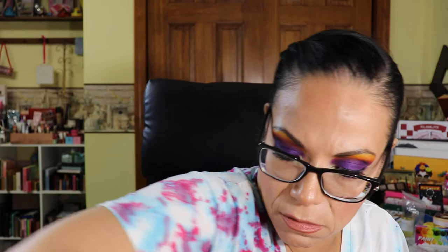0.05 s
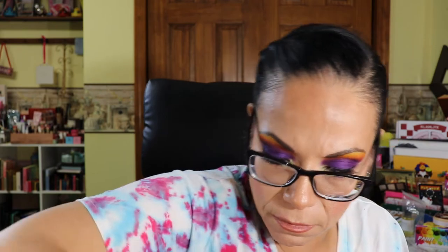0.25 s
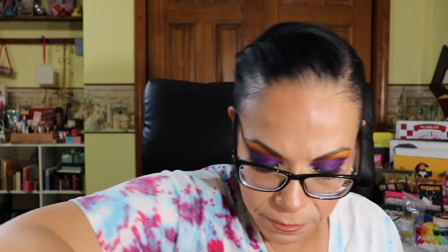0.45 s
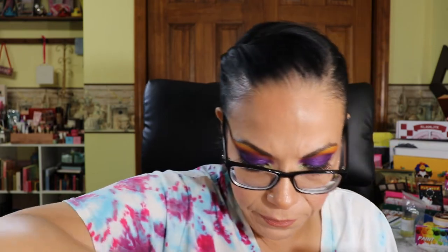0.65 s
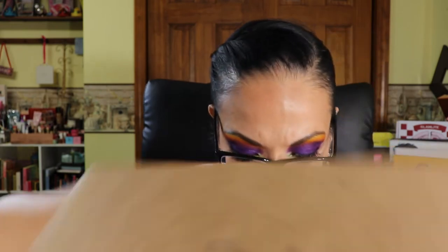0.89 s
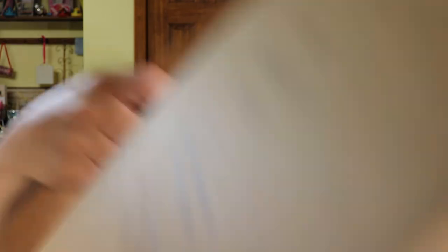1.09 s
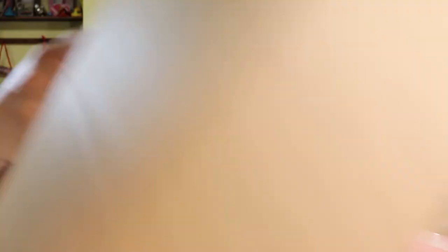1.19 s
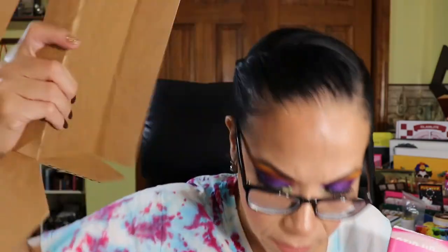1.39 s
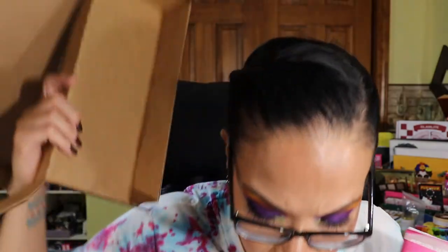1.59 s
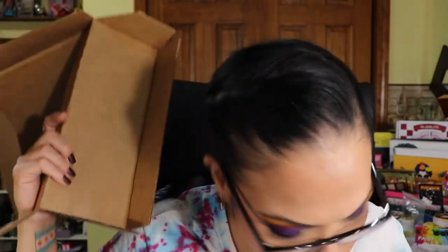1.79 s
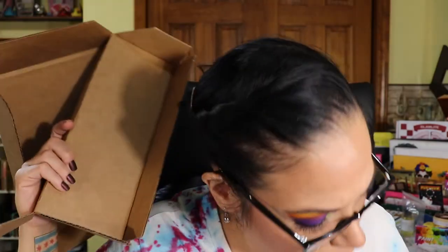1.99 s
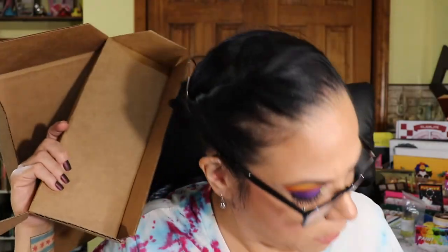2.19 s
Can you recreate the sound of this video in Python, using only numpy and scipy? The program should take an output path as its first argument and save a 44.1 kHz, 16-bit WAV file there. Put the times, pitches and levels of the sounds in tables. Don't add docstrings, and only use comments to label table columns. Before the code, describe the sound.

An empty cardboard box scrapes and hisses over a desk with hollow knocks and small squeaks, then is lifted with a thump and puff of air; quiet follows with a few light taps, close microphone, small room.

```python
import sys
import numpy as np
from scipy import signal
from scipy.io import wavfile

SR = 44100
rng = np.random.default_rng(int(sys.argv[2]) if len(sys.argv) > 2 else 0)


def wrap_up_sound(samples):
    columns = np.atleast_2d(samples).T
    tamed = np.clip(columns, -1, 1)
    steps = np.round(tamed * 32767).astype(np.int16)
    wavfile.write(sys.argv[1], SR, steps)


def amplitude_ratio(level_db):
    exponent = np.asarray(level_db, float) / 20
    return 10 ** exponent


N = 99225

# (pitch [Hz], level [dB], t60 [s])
BOX_MODES = [(102, -16, .2), (165, -9, .15), (210, -7, .1), (262, -4, .1), (365, -3, .1), (470, -5, .15),
             (730, -6, .12), (860, -10, .1), (996, -9, .1), (1150, -12, .1), (1430, -14, .13),
             (1730, -17, .13), (2100, -18, .15), (3600, -24, .12)]


def rms_one(x):
    return x / np.sqrt(np.mean(x ** 2) + 1e-20)


def at_hz(points, hz):
    point_hz, point_db = np.transpose(points)
    return np.interp(np.log(hz), np.log(point_hz), point_db)


def drift(rate_hz):
    r = np.exp(-80 * np.pi * rate_hz / SR)
    slow = signal.lfilter([1], [1, -2 * r, r * r], rng.standard_normal(N // 40 + 2002))[2000:]
    return np.interp(np.arange(N) / 40, np.arange(len(slow)), rms_one(slow))


def ring(clicks, hz, t60):
    r, w = amplitude_ratio(-60 / (t60 * SR)), 2 * np.pi * hz / SR
    return signal.lfilter([0, np.sin(w)], [1, -2 * r * np.cos(w), r * r], clicks + 1e-18)


def cut(x, hz, kind, order=2):
    return signal.sosfilt(signal.butter(order, hz, kind, fs=SR, output="sos"), x)


def grains(per_s, spread_db):
    sizes = amplitude_ratio(spread_db * np.minimum(rng.exponential(1, N), 5)) * rng.choice([-1, 1], N)
    return sizes * (rng.random(N) < per_s / SR)


def coloured(sources, spectrum, patchy_db):
    out = 0
    edges = 60 * 2 ** np.arange(0, 8.6, .5)
    for k, (low, high) in enumerate(zip(edges, edges[1:])):
        band = cut(sources[k % 2], [low, min(high, .45 * SR)], "band")
        band_db = at_hz(spectrum, np.sqrt(low * high)) + patchy_db * drift(41)
        out = out + amplitude_ratio(band_db) * band
    return rms_one(out)


def background():
    # (frequency [Hz], level per Hz [dB])
    air_spectrum = [(47, -39), (80, -16), (91, 18), (242, 6), (338, 8.5), (1310, 0), (1700, -88),
                    (5400, -49.5), (16000, -76.5)]
    # (centre [Hz], width [Hz], level [dB rms])
    whistles = [(1330, 300, -81), (2780, 300, -62), (3350, 310, -58), (5417, 450, -54.5)]
    # (frequency [Hz], level [dB rms])
    harmonics = [(60, -41), (120, -60), (180, -56.5), (240, -57.5)]
    t = np.arange(N) / SR
    out = amplitude_ratio(-52) * coloured(rng.standard_normal((2, N)), air_spectrum, patchy_db=1.5)
    for hz, width, db in whistles:
        out += amplitude_ratio(db) * rms_one(cut(rng.standard_normal(N), [hz - width / 2, hz + width / 2], "band"))
    for k, (hz, db) in enumerate(harmonics):
        out += np.sqrt(2) * amplitude_ratio(db) * np.sin(2 * np.pi * hz * t + 1.97 * k)
    return out


def hiss():
    # (frequency [Hz], level per Hz [dB])
    card_spectrum = [(710, -41), (1200, 1), (1430, -29), (1630, -6.5), (3550, -8.5), (8080, -16.5),
                     (12900, -22), (16000, -23.5)]
    crackle = amplitude_ratio(-1) * rms_one(grains(per_s=700, spread_db=3.0))
    fibres = [crackle + rms_one(grains(per_s=9000, spread_db=1.5)) for _ in range(2)]
    x = cut(coloured(fibres, card_spectrum, patchy_db=2.0), 900, "high")
    x = x * amplitude_ratio(1.2 * drift(40))
    return x / np.sqrt(np.mean(cut(x, 3140, "high", order=4) ** 2))


def drumming():
    # (time [s], level [dB])
    weight = [
        (0, -7.5),
        (.36, 2.5),
        (.42, 4.5),
        (.75, 7),
        (.85, 0.5),
        (2.25, 2),
    ]
    hand_damping = .35
    slips = grains(per_s=4000 * amplitude_ratio(2.3 * drift(30)), spread_db=3)
    dealt = rng.integers(0, len(BOX_MODES), N)
    weight_db = np.interp(np.arange(N) / SR, *np.transpose(weight))
    out = 0
    for k, (hz, db, t60) in enumerate(BOX_MODES):
        lowness = np.clip(np.log2(500 / hz), 0, 1)
        out = out + amplitude_ratio(db + weight_db * lowness) * ring(slips * (dealt == k), hz, hand_damping * t60)
    return rms_one(out)


def low_air(drum_db):
    gust_s, rise_s, fall_s = 1.035, 0.0031, 0.099
    t = np.maximum(np.arange(N) / SR - gust_s, 0)
    gust = amplitude_ratio(-22.5) * (1 - np.exp(-t / rise_s)) * np.exp(-t / fall_s)
    lumps = rms_one(cut(cut(rng.standard_normal(N), 43, "low"), 42, "high"))
    handling = rms_one(cut(rng.standard_normal(N), [60, 140], "band", order=3))
    return gust * lumps + amplitude_ratio(drum_db - 26) * handling


def knocks():
    # (time [s], peak [dB], flap pitch [Hz],
    # t60 [s], crack re peak [dB])
    box_knocks = [(.225, -14.5, 1080, 0.012, -15), (.2305, -3, 372, 0.02, -22),
                  (.2305, -2, 769, 0.034, -21.5), (.2395, -8, 432, 0.03, -48), (.241, -15, 304, 0.15, -50),
                  (.4, -27.5, 1100, 0.018, 2.5), (.407, -8, 432, 0.019, -24),
                  (.464, -17.5, 280, 0.03, -33), (.480, -16, 178, 0.033, -26),
                  (.485, -9.5, 751, 0.036, -4.5), (.492, -12, 887, 0.019, -15),
                  (.499, -12, 800, 0.024, -29), (.508, -8, 840, 0.018, -17), (.515, -10, 750, .03, -16),
                  (.526, -7, 797, 0.029, -19), (.583, -4, 284, 0.01, -26), (.6105, 1, 1047, 0.031, -15.5),
                  (.618, -9, 234, 0.058, -46), (.66, -13.5, 224, 0.045, -19), (.672, -19, 193, 0.045, -30),
                  (.6885, -4.5, 292, 0.02, -27), (.696, -13, 323, 0.021, -30),
                  (.705, -14.5, 147, 0.074, -40), (.722, -17, 182, 0.078, -39), (.753, -17, 300, .04, -30),
                  (.778, -14.5, 330, 0.04, -25), (.803, -15.5, 420, 0.058, -10.5),
                  (.823, -13, 375, 0.025, -20), (.826, -15, 956, 0.024, -11), (.842, -16, 334, 0.1, -46),
                  (.893, -23.5, 3710, 0.032, -1), (.897, -6, 709, 0.098, -40),
                  (.909, -9.5, 974, 0.088, -15.5), (.934, -34, 1060, 0.025, -1),
                  (0.898, -25, 347.4, 0.29, -42), (1.024, -44, 1500, 0.01, 0),
                     (1.034, -14, 499, 0.02, -6), (1.0332, -6.5, 790, 0.004, -22),
                     (1.035, -10, 232, 0.0084, -8), (1.0515, -7, 500, 0.011, -18),
                     (1.05, -12, 443, 0.019, -10.5), (1.039, -14.5, 131, 0.065, -42),
                     (1.2205, -39, 1900, .03, -6), (1.2277, -19.5, 2780, 0.015, -7),
                     (1.589, -49, 2930, 0.11, 1.5), (1.728, -41.5, 710, 0.026, -16),
                     (1.76, -41.5, 670, 0.02, -7), (1.8685, -22, 400, .02, -30),
                     (1.8785, -22, 330, 0.04, -20), (1.9, -20, 215, .04, -20),
                     (1.873, -26, 516, 0.084, -13), (1.88, -26.5, 747, 0.05, -3),
                     (1.965, -39, 896, 0.029, -8), (2.038, -36, 138, 0.098, -10),
                  (0.463, -14.5, 74, 0.079, -62),
        (.6, -13, 161, 0.045, -60),
        (.916, -2.5, 733, 0.036, -27.5),
        (1.035, -10, 66, 0.077, -62),
        (1.051, -8, 296, 0.016, -12),
    ]
    partner, partner_db = 1.13, -9
    box_db, box_slope_db, box_luck_db = -15, 2.5, 4.45
    crack_s, tail_s, tail_db = 0.0053, 0.054, -19.5
    fade_bend = 1.4

    rows = box_knocks
    out, t = np.zeros(N + SR), np.arange(SR // 2) / SR
    luck, body = rng.normal(0, 1, (80, 20)), np.zeros((len(BOX_MODES), N))
    noise = rms_one(cut(cut(rng.standard_normal(N + SR), 530, "high"), 2020, "low"))
    wobble = np.resize(amplitude_ratio(4 * drift(63)), N + SR)
    for (s, db, hz, t60, crack_db), z in zip(rows, luck):
        i = int(s * SR)
        here = slice(i, i + len(t))
        swing = np.sin(2 * np.pi * hz * t)
        swing += amplitude_ratio(partner_db) * np.sin(2 * np.pi * hz * partner * t + z[19])
        swing *= wobble[here] ** np.minimum(3 * t / t60, 1)
        swing *= (1 - np.exp(-t * hz * 2)) * amplitude_ratio(-60 * (t / t60) ** fade_bend)
        crack_fade = np.exp(-t / crack_s) + amplitude_ratio(tail_db) * np.exp(-t / tail_s)
        crack = amplitude_ratio(crack_db) * noise[here] * crack_fade
        out[here] += amplitude_ratio(db) * (crack - swing)
        for k, (mode_hz, mode_db, _) in enumerate(BOX_MODES):
            octaves = abs(np.log2(mode_hz / hz))
            click_db = db + box_db + mode_db - box_slope_db * octaves + box_luck_db * z[k]
            body[k, i] += amplitude_ratio(click_db) * np.sign(z[k + 1])
    return out[:N] + sum(ring(clicks, hz, t60) for clicks, (hz, _, t60) in zip(body, BOX_MODES))


def snaps():
    # (time [s], peak [dB], decay [s], lowest frequency [Hz])
    bursts = [(0.228, -31, 0.0034, 3020), (.486, -38, 0.0027, 3000), (0.897, -25.5, 0.0096, 2940),
              (0.934, -26.5, 0.0018, 4000), (1.024, -42, .02, 5500), (1.034, -21, 0.002, 1780),
              (1.0455, -30, 0.008, 5000), (1.2224, -29, 0.00057, 4970), (1.225, -22.5, 0.003, 2480),
              (1.882, -39.5, 0.011, 3030), (1.256, -48, .012, 4000), (1.959, -41, 0.0069, 5030)]
    t, noise = np.arange(N) / SR, rng.standard_normal(N)
    out = np.zeros(N)
    for s, db, fall_s, hz in bursts:
        band = cut(cut(noise, hz, "high"), min(0.3 * hz, .45 * SR), "low", order=1)
        fade = (t >= s) * np.exp(-np.maximum(t - s, 0) / fall_s)
        out += amplitude_ratio(db) * fade * rms_one(band)
    return out


def rings():
    # (time [s], peak [dB], pitch [Hz], t60 [s])
    free_modes = [(.2329, -3, 395, .035), (.2326, -12, 510, .05), (.256, -25, 420, .2),
                  (1.1, -24, 110, .15), (1.8718, -12, 208, .1), (1.0355, -2, 290, .016),
                  (.2325, -8, 800, .05), (.232, -25, 1590, 0.024), (.25, -26, 747, .15),
                  (1.052, -22, 342.3, .33), (1.052, -17.5, 497, 0.074), (1.226, -26, 1940, 0.054),
                  (1.2255, -29, 2850, 0.056), (1.226, -29, 3460, .03), (1.2255, -25, 5050, 0.017),
                  (1.06, -33, 1733, .3), (1.062, -35, 1432, .25), (1.874, -27, 635, 0.12),
                  (1.876, -24.5, 804, 0.097), (1.878, -31, 1103, 0.089), (1.905, -22, 206.5, .35),
                  (1.962, -40, 749, 0.24), (2.03, -32.5, 205, 0.12), (2.07, -46, 752, 0.21)]
    out = np.zeros(N)
    for s, db, hz, t60 in free_modes:
        i = int(s * SR)
        click = np.zeros(N - i)
        click[0] = -amplitude_ratio(db)
        out[i:] += ring(click, hz, t60)
    return out


def squeaks():
    # (time [s], length [s], pitch [Hz], level [dB])
    rubs = [(.42, 0.013, 1970, -38), (.49, 0.047, 1880, -29), (.508, .02, 4300, -28),
            (0.546, 0.034, 1450, -29), (0.56, .016, 3680, -32), (.577, 0.013, 2280, -31),
            (0.71, .014, 2420, -47), (.73, .045, 5360, -40), (0.734, 0.036, 2110, -36),
            (0.76, 0.017, 3500, -37.5), (.79, 0.058, 5400, -40), (0.822, 0.016, 4000, -44),
            (1.234, .04, 2300, -46), (1.055, 0.06, 1212, -46), (.665, .04, 6000, -44),
            (.67, .03, 11000, -48), (1.09, .05, 10500, -58)]
    width = 0.078
    t, noise = np.arange(N) / SR, rng.standard_normal(N)
    out = np.zeros(N)
    for s, length, hz, db in rubs:
        swell = np.sqrt(np.sin(np.pi * np.clip((t - s) / length, 0, 1)) + 1e-12)
        out += amplitude_ratio(db) * swell * rms_one(ring(noise, hz, 2.8 / (width * hz)))
    return out


def ticks():
    # (time [s], peak [dB])
    edges_let_go = [
        (1.2227, -26),
        (1.2246, -5),
        (1.2251, -14),
    ]
    out = np.zeros(N)
    for s, db in edges_let_go:
        out[int(s * SR)] = amplitude_ratio(db)
    return cut(out, 7000, "high")


def room(x):
    t60, wall_cut_hz = 0.19, 4200
    out, dull = np.zeros(N), np.exp(-2 * np.pi * wall_cut_hz / SR)
    lags = (rng.uniform(.012, 0.032, 10) * SR).astype(int)
    for k, lag in enumerate(lags):
        loop, gain, state = x.copy(), amplitude_ratio(-60 * lag / SR / t60), [0.]
        for i in range(lag, N, lag):
            back, state = signal.lfilter([gain * (1 - dull)], [1, -dull], loop[i - lag:i], zi=state)
            loop[i:i + lag] += back[:N - i]
        out += (loop - x) * (-1) ** k
    return out


def scene():
    # (time [s], hiss [dB], drumming of the panels [dB])
    slide = [(0, -42.5, -27), (.12, -41, -29.5), (0.229, -39, -27), (.24, -47, -19), (0.372, -47.5, -35.5),
             (0.408, -42, -22), (.5, -33.5, -17.5), (0.604, -32, -18), (.635, -38, -25), (0.689, -37, -17),
             (.79, -34.5, -32.5), (0.836, -39.5, -18), (.885, -47.5, -31.5), (1.02, -55.5, -38),
             (1.3, -64, -60.5), (1.84, -54, -51.5), (1.9, -48, -37.5), (2.25, -66, -56.5)]
    t = np.arange(N) / SR
    times, hiss_points, drum_points = np.transpose(slide)
    hiss_db = np.interp(t, times, hiss_points)
    drum_db = np.interp(t, times, drum_points)
    sliding = amplitude_ratio(hiss_db + 1.67) * hiss() + amplitude_ratio(drum_db - 2) * drumming()
    box = sliding + knocks() + snaps() + rings() + squeaks() + ticks()
    return (box + amplitude_ratio(-21.5) * room(box) + low_air(drum_db) + background())[None]


def top_cut(x):
    return signal.sosfilt(signal.butter(12, 16990, fs=SR, output="sos"), x)


def record(dry):
    limit_db, release_db_per_s, top = -6, 70, 1.0
    self_noise = amplitude_ratio(-62) * cut(rng.standard_normal(N), 5000, "high")
    dry = cut(dry, 25, "high", order=3) + self_noise
    over_db = np.maximum(20 * np.log10(np.abs(dry) + 1e-9) - limit_db, 0)
    slope = release_db_per_s * np.arange(N) / SR
    duck_db = np.maximum(np.maximum.accumulate(over_db + slope, axis=1) - slope, 0)
    x = dry * amplitude_ratio(-.6 * signal.lfilter([.002], [1, -.998], duck_db))
    rounded = top * np.tanh(x / top)
    mix = signal.sosfilt(signal.cheby2(12, 24, 15900 * 1.01, fs=SR, output="sos"), rounded)
    return top_cut(mix)


dry = scene()
out = record(dry)
wrap_up_sound(out)
```